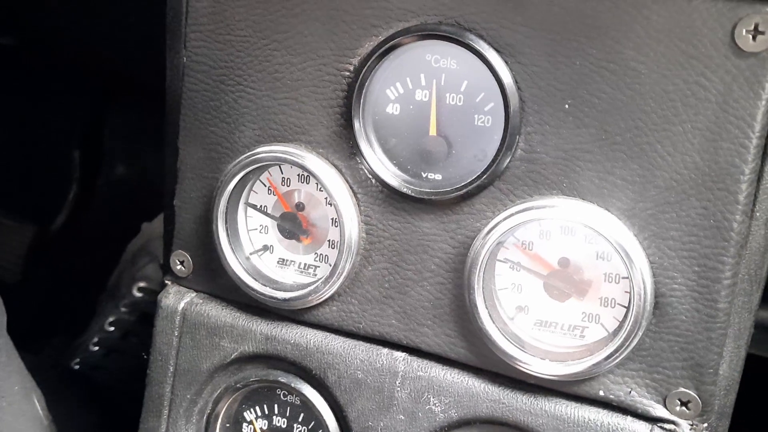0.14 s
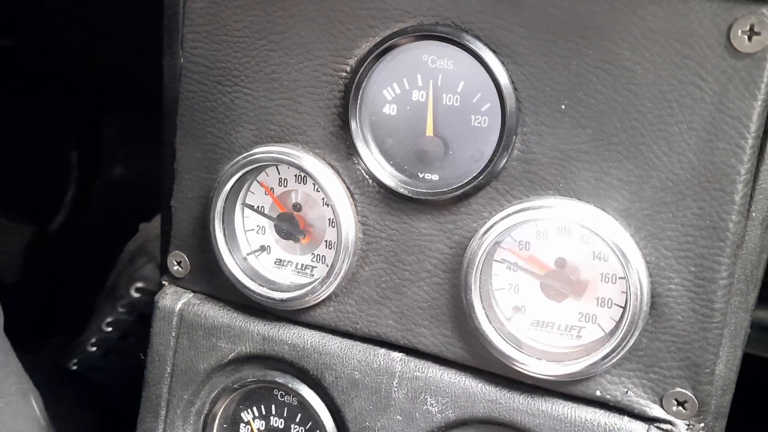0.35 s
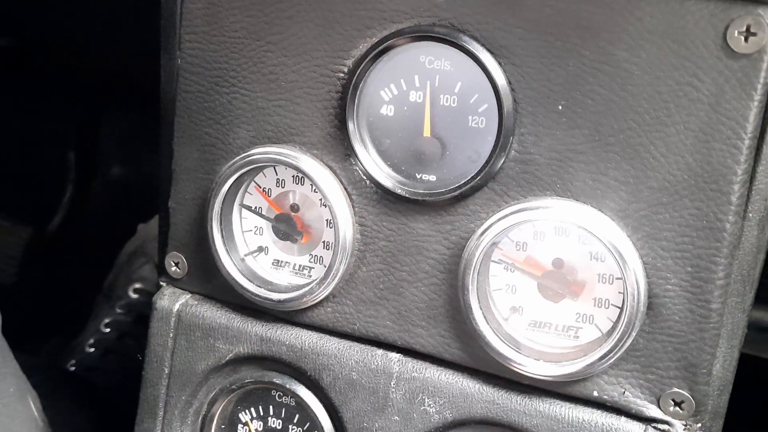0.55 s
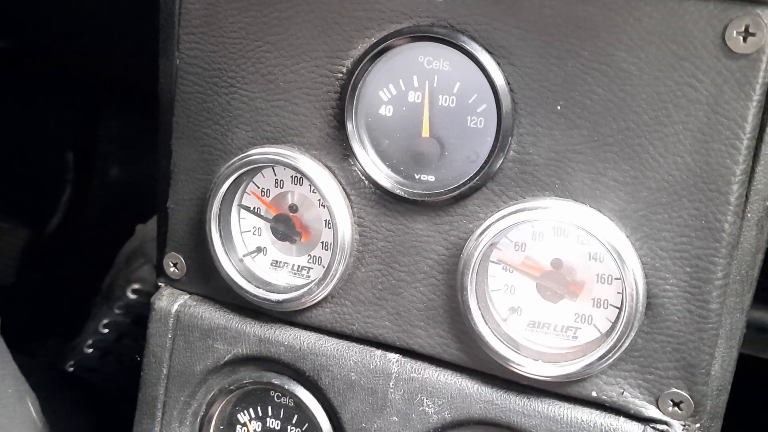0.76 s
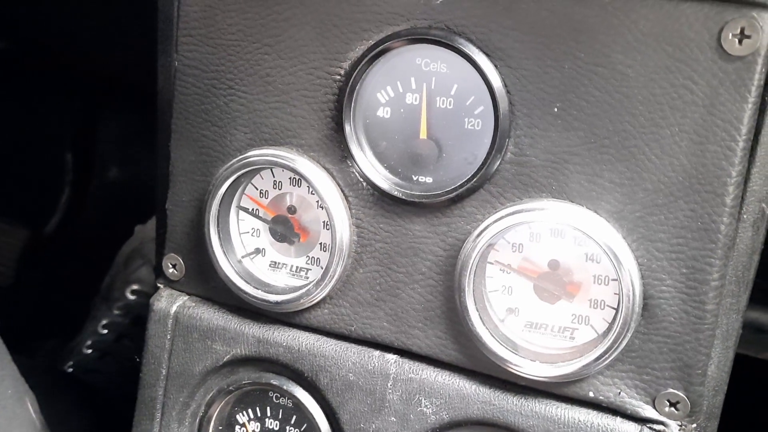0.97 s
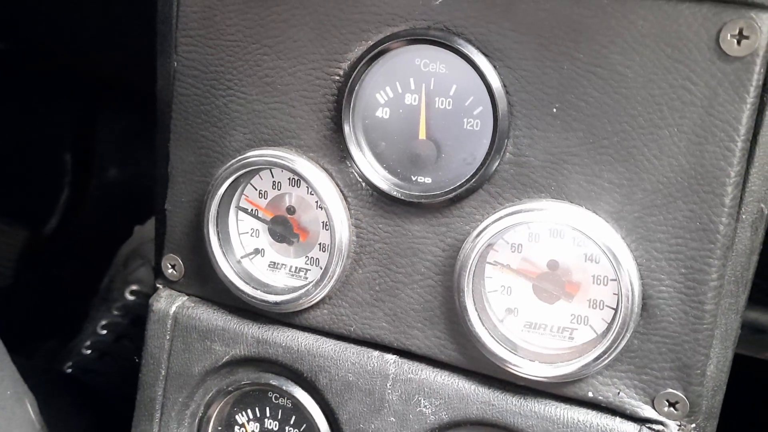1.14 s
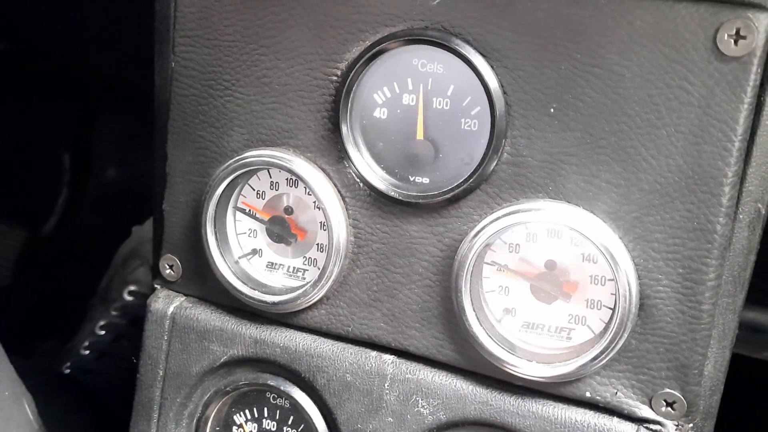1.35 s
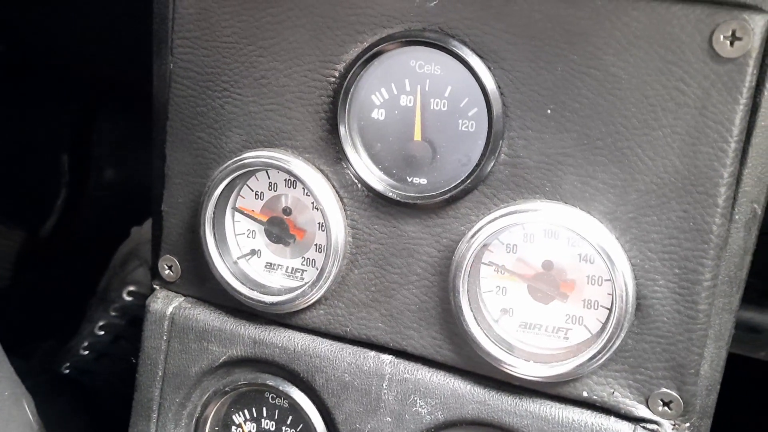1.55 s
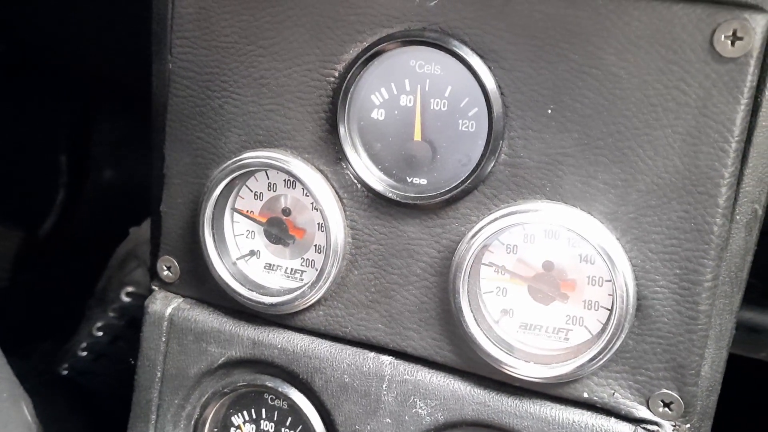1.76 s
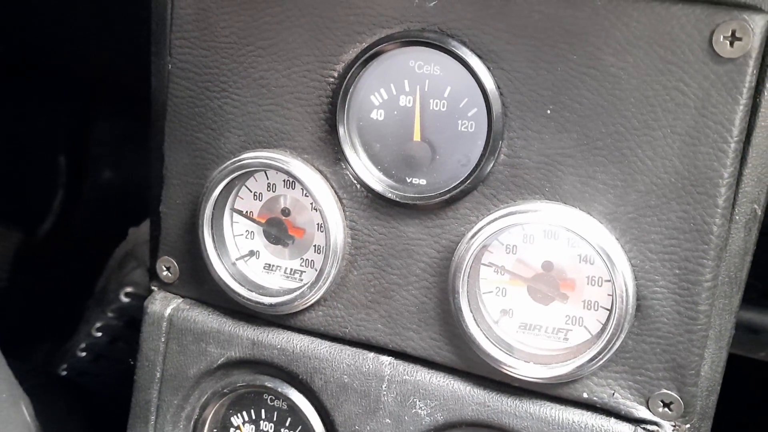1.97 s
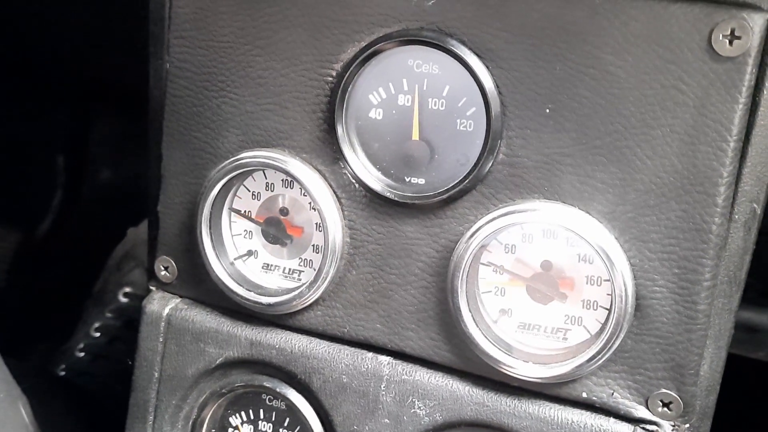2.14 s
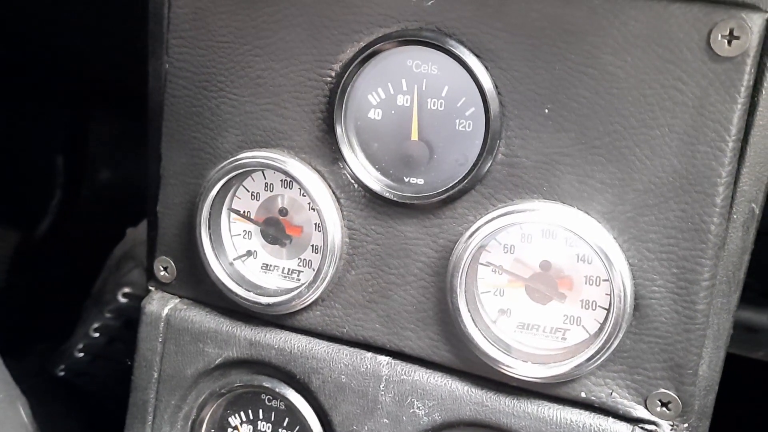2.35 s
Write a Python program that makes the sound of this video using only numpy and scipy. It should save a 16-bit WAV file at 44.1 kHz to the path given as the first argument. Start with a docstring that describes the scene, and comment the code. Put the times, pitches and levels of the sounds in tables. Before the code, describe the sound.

Inside a parked car, a close microphone picks up a steady sharp hiss of escaping air, already running at the start, softening as pressure falls, gaining a duller roar halfway, above a deep, slightly uneven idle hum.

```python
"""Inside a parked car, one microphone: air bags vent through their valves close by, a bright jet hiss
that sinks with the pressure, coloured by fixed peaks and gaps of the hoses, body and cabin.
A duller roar joins at 1.13 s, and narrow whistly bands of air noise swell late, then ease.
The engine idles underneath, each firing ringing the cabin and exhaust booms over a rough rumble."""
import sys
import numpy as np
from scipy import signal
from scipy.fft import rfft, irfft
from scipy.io import wavfile
from scipy.ndimage import uniform_filter1d

SR = 44100
rng = np.random.default_rng(int(sys.argv[2]) if len(sys.argv) > 2 else 0)


def store_pcm(level_fs):
    """Save levels as 16-bit WAV."""
    pcm = np.round(np.clip(level_fs, -1, 1) * 32767).astype(np.int16)
    wavfile.write(sys.argv[1], SR, np.atleast_2d(pcm).T)


def undo_db(level):
    """Turn decibels back into plain size, where 20 dB means ten times bigger."""
    steps = np.asarray(level, float) / 20
    return 10 ** steps


N = 110250

# course of the jet; its mean sets the level, its swing is scaled band by band: time_s, level_db
JET_COURSE = [(0, -23.3), (.1, -24), (.2, -24.8), (.24, -23.3), (.28, -24.8), (.5, -25), (.68, -25.8),
              (.8, -26.8), (1.17, -26.8), (1.3, -26), (1.49, -26), (1.56, -28), (1.82, -28), (2.1, -28.6),
              (2.5, -29.6)]
# broad jet colour: frequency_hz, density_db (relative)
JET_COLOUR = [(120, -55), (200, -21.5), (370, -22), (540, -24), (1090, -17), (1670, -17), (2070, -16.5),
              (3120, -7), (4780, -2.5), (6000, -6), (8000, -8), (9600, -10), (11000, -12.5), (12200, -18.5),
              (14300, -25.5)]
# how strongly each band follows the jet's course: frequency_hz, follow_db_per_db
JET_FOLLOW = [(300, -0.27), (1500, 0.35), (2800, 0.37), (4500, 1.5), (6500, .5), (9000, .5), (11000, 1.3),
              (14000, 1.5)]
# extra gain of the treble bands of the jet: time_s, gain_db
TREBLE_GAIN = [(0, -0.5), (.3, 0), (.6, 0.5), (1.0, 1.6), (1.4, 1.0), (1.7, .5), (2.1, -0.5), (2.5, 0)]
# brief dropout heard in the hiss, not made by the valves, deepest in lows and top: frequency_hz, gain_db
DROPOUT_GAIN = [(300, -9), (2600, -10), (3500, -2.5), (7500, -3), (10000, -8), (14000, -9)]
# colour of the later roar: frequency_hz, density_db (relative)
ROAR_COLOUR = [(180, -20), (330, 1), (500, -6.5), (900, 2.5), (1500, -2.5), (2300, -4.5), (3200, -8),
               (4500, -23)]
# peaks and gaps on the way from valves to microphone: frequency_hz, width_hz, gain_db
PATH_PEAKS = [(610, 57, 4), (710, 33, -7), (1103, 76, 5.5), (1224, 81, -6.5), (1473, 80, 7), (1590, 39, -4),
              (1642, 62, 7), (2065, 260, -6), (2334, 26, -1.5), (2570, 66, 5.5), (2780, 250, -0.5),
              (3188, 94, 6.5), (3280, 120, -4.5), (3440, 58, -7.5), (3628, 83, 8), (3720, 56, -6.5),
              (3887, 60, 5.5), (3960, 40, -2.5), (3970, 44, 4), (4190, 41, 6), (4410, 33, 3),
              (4590, 90, -5.5), (4720, 146, 3.5), (4980, 60, -2), (5100, 100, 2), (5870, 80, -1),
              (5860, 80, 1.5), (6000, 60, -5), (6210, 180, 2), (6940, 80, -0.5), (7330, 90, 5),
              (7800, 200, 2.5), (9100, 160, 2.5), (10400, 70, 2.5), (10640, 130, -6.5), (10700, 120, 4.5),
              (11460, 170, -2), (13800, 240, 7.5)]
# course of the whistly bands together: time_s, level_db
WHISTLE_COURSE = [(0, -44), (.8, -43), (1.4, -36), (1.7, -36), (1.98, -32.5), (2.15, -37), (2.5, -38)]
# the whistly bands: frequency_hz, width_hz, level_db (relative)
WHISTLE_BANDS = [(5220, 86, -1), (7740, 270, 0.5), (9050, 150, -3), (10000, 100, -3), (10700, 84, -4)]
# strength of the firings of the four cylinders in turn: level_db (relative)
CYLINDER_LEVELS = [0.6, -0.9, 0.2, -0.5]
# weak firings: time_s, gain_db
WEAK_FIRINGS = [(.515, -18), (1.89, -2), (2.165, -1)]
# cabin and exhaust booms: frequency_hz, t60_s, level_db (relative), signed_gain (polarity)
BOOMS = [(29, 0.2, -31, 1), (56.6, 0.23, -1.5, -1.4), (84.4, .1, -0.5, 0.83), (120, 0.11, -5, 1),
         (144.8, 0.15, -5.5, 1), (174, 0.15, -6, 1)]
# engine rumble colour: frequency_hz, density_db (relative)
RUMBLE_COLOUR = [(6, 8), (20, -2), (40, -6), (100, -16), (180, 3), (230, -31), (400, -33)]

JET_TRIM_DB, TREBLE_FROM_HZ = 3, 5800
FLICKER_DB, FLUTTER_DB = .5, .3  # typical swing of each band alone, and of all bands together
DROPOUT_S, DROPOUT_LENGTH_S = 2.018, .008
ROAR_S, ROAR_RISE_S, ROAR_FALL_DB_PER_S = 1.13, 0.12, 4
ROAR_DB = -39.5  # before its rise, its fall and the path
FIRING_HZ, FIRST_FIRING_S = 29.16, .001
SCATTER_DB, JITTER_S = 1.6, 0.0006  # standard deviations from firing to firing
BOOM_LAG_S_PER_HZ = 0.000121  # higher booms arrive later
BOOM_LOW_HZ, BOOM_TOP_HZ = 26, 192.6
BOOM_DB, RUMBLE_DB = -38.5, -51
RECORDER_TOP_HZ = 14190


def level(x, db):
    """Set the rms level in dB re full scale."""
    return x * undo_db(db) / np.sqrt(np.mean(x ** 2))


def curve(rows, t):
    """Straight lines in time."""
    return np.interp(t, *np.array(rows, float).T)


def colour(rows, hz):
    """Straight lines in dB on a log frequency axis."""
    rows = np.array(rows, float)
    return np.interp(np.log(np.maximum(hz, 1)), np.log(rows[:, 0]), rows[:, 1])


def noise(rows):
    """Steady noise of a given colour, rms 1."""
    gain = undo_db(colour(rows, np.fft.rfftfreq(N, 1 / SR)))
    spectrum = rfft(rng.standard_normal(N)) * gain
    return level(irfft(spectrum, N), 0)


def walk(rate_hz):
    """Random levels, each held 1 / rate_hz seconds, then smoothed twice."""
    hold = int(SR / rate_hz)
    steps = np.repeat(rng.standard_normal(N // hold + 1), hold)
    smooth = uniform_filter1d(uniform_filter1d(steps, hold), hold)
    return 1.31 * smooth[:N]  # makes up for the swing lost in smoothing


def jet(t):
    """Turbulent noise in third-octave bands; the core and the very top sink fastest with the pressure."""
    hz = np.fft.rfftfreq(N, 1 / SR)
    spectrum = rfft(noise(JET_COLOUR))
    course = curve(JET_COURSE, t)
    swing = course - course.mean()
    flutter = FLUTTER_DB * walk(24.14)
    out = 0
    for centre_hz in 200 * 2 ** (np.arange(20) / 3):
        # triangular bands that cross-fade into their neighbours
        share = np.clip(1 - np.abs(3 * np.log2(np.maximum(hz, 1) / centre_hz)), 0, 1)
        band = irfft(spectrum * share, N)
        gain_db = colour(JET_FOLLOW, centre_hz) * swing + flutter + FLICKER_DB * walk(18)
        if centre_hz > TREBLE_FROM_HZ:
            gain_db = gain_db + curve(TREBLE_GAIN, t)
        out = out + band * dropout(t, centre_hz) * undo_db(gain_db)
    return out * undo_db(course.mean() + JET_TRIM_DB)


def roar(t):
    """A duller outflow: coloured noise that swells in, then sinks, wavering."""
    since = np.maximum(t - ROAR_S, 0)
    rise = 1 - np.exp(-since / ROAR_RISE_S)
    level_db = ROAR_DB - ROAR_FALL_DB_PER_S * since + 1.2 * walk(10.12)
    return noise(ROAR_COLOUR) * rise * undo_db(level_db)


def dropout(t, hz):
    """Gain at one frequency of the brief dropout heard in the hiss; the valves themselves vent on."""
    bell = np.exp(-((t - DROPOUT_S) / DROPOUT_LENGTH_S) ** 2)
    return undo_db(colour(DROPOUT_GAIN, hz) * bell)


def path(x):
    """Fixed resonant peaks and gaps between valves and microphone."""
    hz = np.fft.rfftfreq(N, 1 / SR)
    db = sum(gain / (1 + (2 * (hz - centre) / width) ** 2) for centre, width, gain in PATH_PEAKS)
    return irfft(rfft(x) * undo_db(db - db.mean()), N)


def whistle(t):
    """Narrow resonant bands of air noise that waver together."""
    hz = np.fft.rfftfreq(N, 1 / SR)
    shape = sum(undo_db(db) / (1 + (2 * (hz - centre) / width) ** 2) for centre, width, db in WHISTLE_BANDS)
    bands = level(irfft(rfft(rng.standard_normal(N)) * shape, N), 0)
    return bands * undo_db(curve(WHISTLE_COURSE, t) + 1.0 * walk(12.1))


def firings(lead):
    """One pulse per firing, uneven in strength and timing, with lead samples spare at both ends."""
    k = np.arange(-16, 80)  # starts early, so that the booms already ring at 0 s
    strength_chance, timing_chance = rng.standard_normal((len(k), 2)).T
    at = FIRST_FIRING_S + k / FIRING_HZ
    db = SCATTER_DB * strength_chance + np.array(CYLINDER_LEVELS)[k % 4]
    # each weak time picks the firing nearest to it
    db = db + sum(gain * (np.abs(at - s) < .5 / FIRING_HZ) for s, gain in WEAK_FIRINGS)
    pulses = np.zeros(N + 2 * lead)
    pulses[((at + JITTER_S * timing_chance) * SR).astype(int) + lead] = undo_db(db)
    return pulses


def boom_ring():
    """One second of decaying sines: what a single firing rings in cabin and exhaust."""
    u = np.arange(SR) / SR
    ring = 0
    for hz, t60, db, sign in BOOMS:
        late = np.maximum(u - BOOM_LAG_S_PER_HZ * hz, 0)
        decay = np.exp(-np.log(1000) * late / t60)
        ring = ring + sign * undo_db(db) * decay * np.sin(2 * np.pi * hz * late)
    return ring


def engine():
    """Uneven firings ring the booms; a rough steady rumble lies between them."""
    lead = SR
    rung = signal.fftconvolve(firings(lead), boom_ring())
    band = signal.butter(4, [BOOM_LOW_HZ, BOOM_TOP_HZ], "band", fs=SR, output="sos")
    boom = signal.sosfilt(band, rung)[lead:lead + N]
    return level(boom, BOOM_DB) + noise(RUMBLE_COLOUR) * undo_db(RUMBLE_DB)


def scene():
    """All sources reach one microphone, laid on two equal channels."""
    t = np.arange(N) / SR
    valves = path(jet(t) + dropout(t, 1000) * roar(t))
    return np.tile(valves + whistle(t) + engine(), (2, 1))


def top_cut(x):
    """Nothing passes above 14.73 kHz: the treble ends there."""
    return signal.sosfilt(signal.butter(12, 14730, fs=SR, output="sos"), x)


def record(dry):
    """The recorder cuts the top steeply, without phase shift."""
    low_pass = signal.ellip(10, .1, 60, RECORDER_TOP_HZ, fs=SR, output="sos")
    mix = signal.sosfiltfilt(low_pass, dry)
    return top_cut(mix)


dry = scene()
out = record(dry)
store_pcm(out)
```